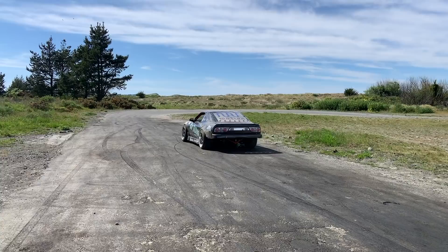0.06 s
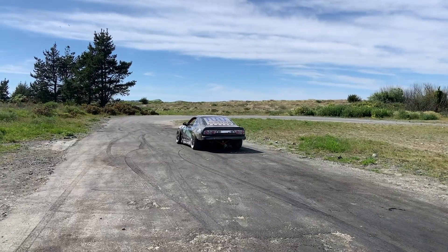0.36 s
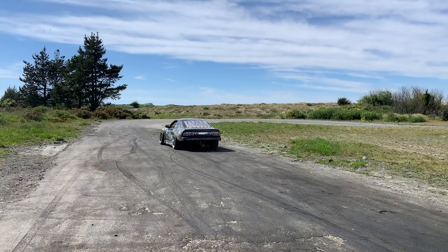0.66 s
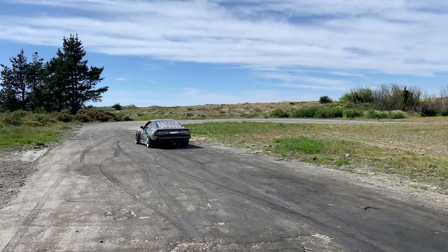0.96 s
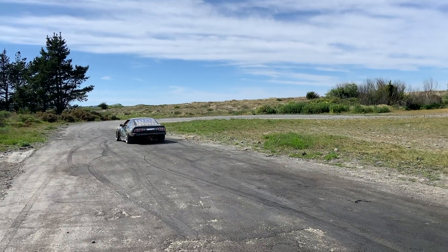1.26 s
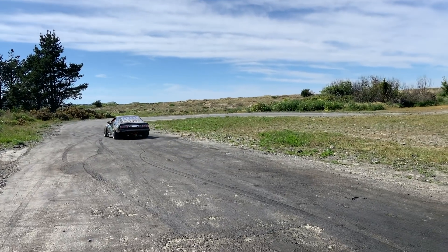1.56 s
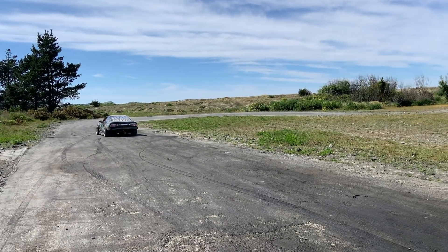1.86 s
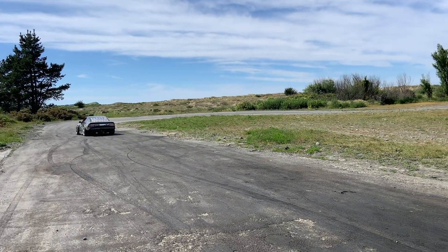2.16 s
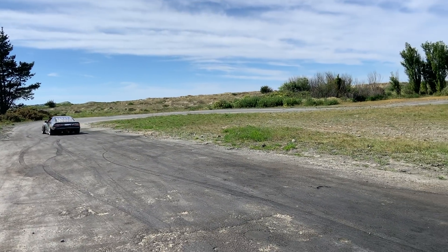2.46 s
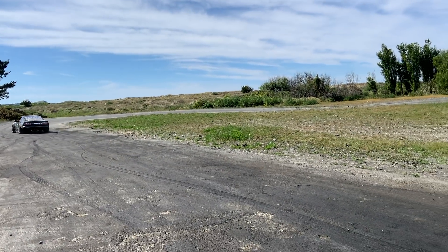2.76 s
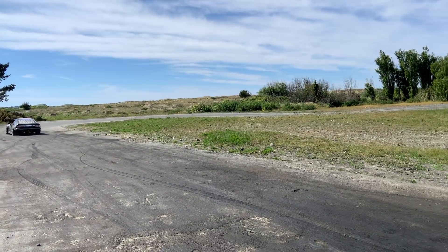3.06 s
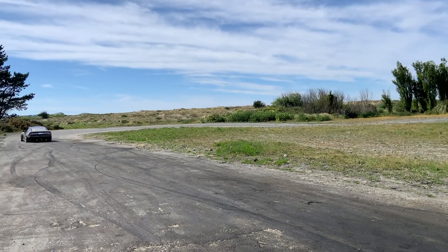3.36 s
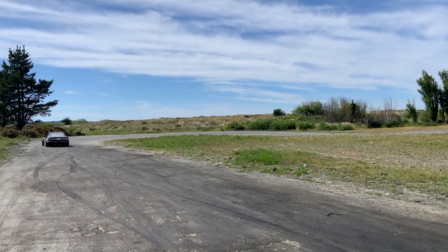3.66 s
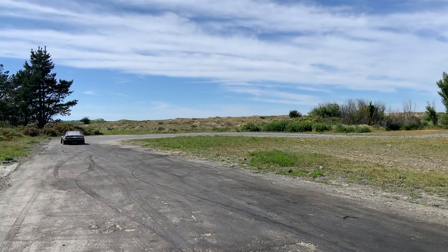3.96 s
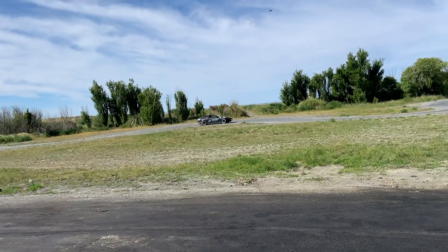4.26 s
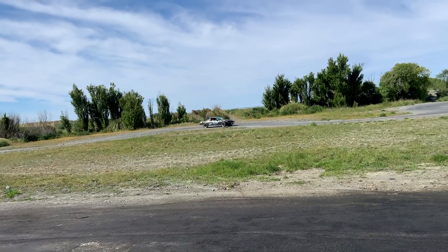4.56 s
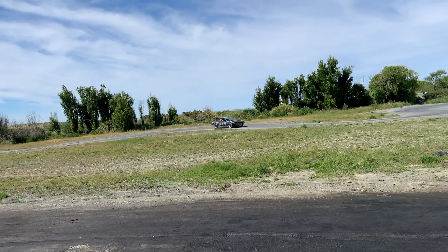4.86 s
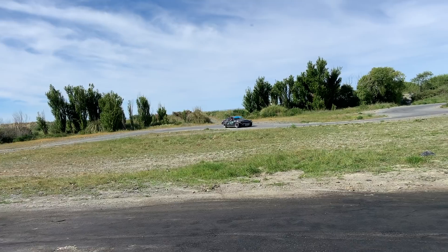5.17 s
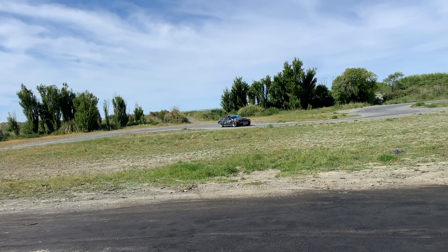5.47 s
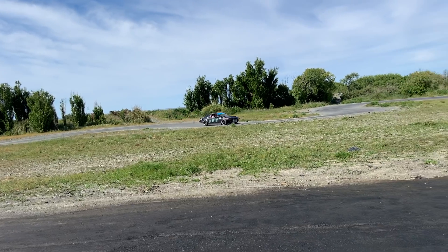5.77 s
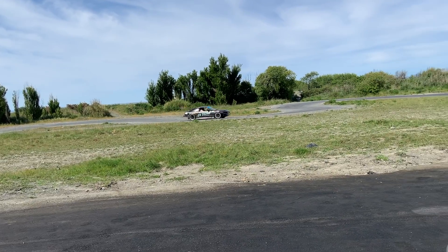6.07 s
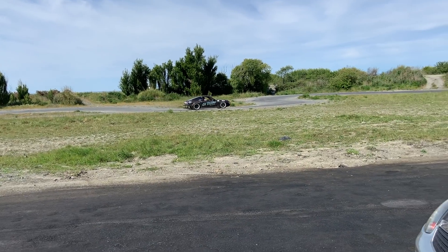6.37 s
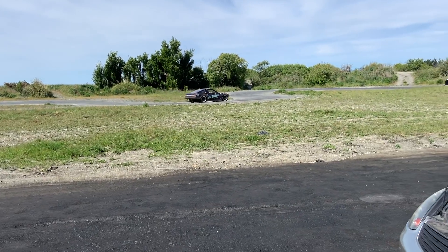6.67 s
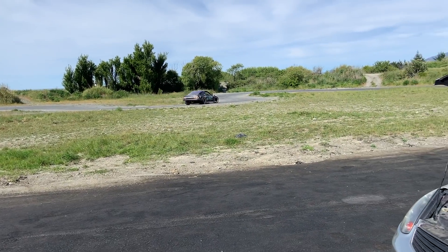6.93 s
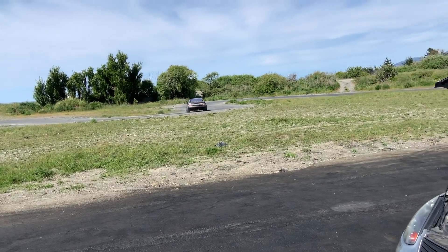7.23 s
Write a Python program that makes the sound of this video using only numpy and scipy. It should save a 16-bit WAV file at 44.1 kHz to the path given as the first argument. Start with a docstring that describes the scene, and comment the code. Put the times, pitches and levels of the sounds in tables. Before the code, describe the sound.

Outdoors beside a track, gusts buffet the microphone while a car drives away with a low pulsing exhaust, a few pops and crunching tyres. A second car idles softly throughout, with faint chirps early on. About halfway, the moving car is suddenly heard in a distant bend, where its revs rise, drop and then surge in sharp stabs as the tyres scrub, spray sand and give short, fluttering squeals.

```python
"""A drift car pulls away and slides

A six-cylinder car drives off over gritty asphalt, its exhaust pulsing with each firing. Wind bumps the
microphone, another engine idles and something twitters. After a cut the car slides through a far bend:
the tyres scrub and squeal, the revs sag, then flare as the tail swings round. A grassy bank echoes
faintly, and two close microphone openings hear the treble a little apart."""
import sys
import numpy as np
from scipy import signal
from scipy.fft import rfft, irfft, next_fast_len
from scipy.io import wavfile
from scipy.ndimage import map_coordinates

SR = 44100
rng = np.random.default_rng(int(sys.argv[2]) if len(sys.argv) > 2 else 0)


def unload_audio(sound):
    """Save the sound as a 16-bit wav file, at the path given as the first command line argument."""
    columns = np.transpose(np.atleast_2d(sound))
    # keep every value between -1 and 1, then stretch to whole-number steps
    steps = np.round(np.clip(columns, -1, 1) * 32767)
    wavfile.write(sys.argv[1], SR, steps.astype(np.int16))


N = 326340
TIME = np.arange(N) / SR
LAUNCH_S, CUT_S = 0.427, 4.03  # the clutch bites; the scene jumps to the bend
START_M, SPEED_M_PER_S = 12, 5  # the car as it drives off


def amp(db):
    """Decibels to gain."""
    return 10 ** (np.asarray(db) / 20)


def decibels(gain):
    """Gain to decibels."""
    return 20 * np.log10(gain)


def unit(x):
    """Scale to an average (rms) level of 1."""
    return x / np.sqrt(np.mean(x ** 2) + 1e-20)


def curve(points):
    """Join (time, value) points into one value per sample."""
    return np.interp(TIME, *np.transpose(points))


def along(points, hz):
    """Read between (frequency, value) points on a log axis."""
    freqs, values = np.transpose(points)
    return np.interp(np.log(hz + 1), np.log(freqs + 1), values)


def wobble(rate):
    """A smooth curve through `rate` random values a second."""
    coarse = np.arange(0, N + 32, 32) / SR
    values = rng.standard_normal(int(N * rate / SR) + 5)
    return np.interp(TIME, coarse, map_coordinates(values, [coarse * rate]))


def swell(start, end, attack, release):
    """Rise smoothly to 1, hold until the end, then die away."""
    rise = np.clip((TIME - start) / attack, 0, 1)
    return np.sin(rise * np.pi / 2) ** 2 * np.exp(-np.maximum(TIME - end, 0) / release)


def filtered(x, response):
    """Multiply each frequency in x by response(hz)."""
    size = next_fast_len(N + 8192)
    return irfft(rfft(x, size) * response(np.fft.rfftfreq(size, 1 / SR)), size)[..., :N]


def shaped(x, spectrum):
    """Colour x with (frequency [Hz], gain [dB]) points."""
    return filtered(x, lambda hz: amp(along(spectrum, hz)))


def noise(spectrum):
    """Coloured noise at level 1."""
    return unit(shaped(rng.standard_normal(N), spectrum))


def angle(hz):
    """Running phase of a moving frequency."""
    return 2 * np.pi * np.cumsum(hz) / SR


def tone(phase, db):
    """A sine wave at the given rms level."""
    return np.sqrt(2) * amp(db) * np.sin(phase)


def bursts(rows, spectrum, decay):
    """Short cracks of coloured noise that start suddenly."""
    size = sum(amp(db) * (TIME > s) * np.exp(-np.abs(TIME - s) / decay) for s, db in rows)
    return filtered(size * rng.standard_normal(N), lambda hz: unit(amp(along(spectrum, hz))))


def distance():
    """Metres to the car as it drives off."""
    return START_M + SPEED_M_PER_S * np.maximum(TIME - LAUNCH_S, 0)


def dulled(x):
    """Air swallows the treble of a far sound."""
    return shaped(x, [(6500, 1), (9000, -10.5), (12000, -8.5), (15000, -6.0)])


def bank_echo(x, fade_s):
    """Grass and trees scatter sound back, differently left and right."""
    t = np.arange(SR // 2) / SR
    tail = rng.standard_normal((2, len(t))) * amp(-60 * t / fade_s)
    echo = signal.fftconvolve(x[None], tail / np.linalg.norm(tail[0]), axes=1)[:, :N]
    return shaped(echo, [(150, -26), (500, -13), (1500, -11), (8000, -22)])


def chirping():
    """A thin, trembling twitter: a few clear chirps among runs of soft ones."""
    # clear chirps (time [s], pitch [Hz], level [dB])
    clear_chirps = [(.1, 3240, -45), (2.665, 3380, -52.5), (2.803, 3244, -47.5)]
    # soft runs (start [s], end [s], level [dB])
    soft_runs = [(0.305, 0.897, -56.5), (2.5, 3.25, -55.5)]
    tremble = angle(1 + .024 * wobble(300))  # phase of an unsteady 1 Hz
    chirps = list(clear_chirps)
    for start, end, db in soft_runs:
        for s in np.arange(start, end, .06):
            late, sharp, loud = rng.standard_normal(3)
            chirps.append((s + .04 * late, 3300 * (1 + .025 * sharp), db + 3 * loud))
    out = np.zeros(N)
    for s, hz, db in chirps:
        near = np.abs(TIME - s) < .05
        phase = hz * tremble[near]
        voice = tone(phase, db) + tone(2 * phase, db + rng.normal(-3, 3))
        out[near] += np.exp(-((TIME[near] - s) / 0.012) ** 2) * voice
    return out


def idling():
    """A waiting car hums steadily over a soft, low murmur."""
    # tones of the hum, main one first (pitch [Hz], level [dB])
    tones = [(124.5, -37), (74.2, -43.5), (248.5, -48.5), (369.4, -49.5)]
    main_hz = tones[0][0]
    phase = angle(main_hz * (1 + 0.01086 * wobble(25)))
    hum = sum(tone(phase * hz / main_hz, db + 2.7 * wobble(15)) for hz, db in tones)
    murmur = noise([(40, -7.5), (80, -1), (330, -6.5), (2000, -26.5), (7000, -50), (16000, -65)])
    return hum + amp(-37) * murmur


def wind(breeze_db=-48.5):
    """Gusts rumble and thump on the microphone, partly different left and right."""
    # gusts (start [s], end [s], level [dB])
    gusts = [(-.1, 0.1, -23), (0.273, 0.423, -23), (1.094, 1.93, -30), (2.623, 3.881, -31.5)]
    # thumps (time [s], level [dB])
    thumps = [(.308, -14.5), (1.25, -12), (1.613, -15), (2.71, -25), (2.89, -20.5), (3.244, -20.5),
              (3.37, -17.5), (3.419, -14)]
    # colour of the rumble (frequency [Hz], level [dB])
    colour = [(18, -44.5), (38, -26), (55, 13), (80, 4.5), (120, 3), (220, -4.5), (4000, -110)]
    gusting = sum(amp(db) * swell(start, end, attack=0.11, release=0.11) for start, end, db in gusts)
    middle, side = (unit(noise(colour) * amp(0.8 * wobble(14))) for _ in range(2))
    out = (amp(breeze_db) + gusting) * (middle + 0.17 * side * np.array([[1], [-1]]))
    for s, db in thumps:
        push = amp(db) * np.exp(-((TIME - s) / 0.016) ** 2)
        out += push * np.sin(angle(80 * (1 + 0.291 * wobble(90))))
    return out


def stone_ticks():
    """Flicked-up stones tick."""
    # ticks (time [s], level [dB])
    ticks = [(2.68, -37), (4.3121, -31.5), (5.6894, -38)]
    return bursts(ticks, [(300, -10), (1500, 0), (3500, -16), (15000, -55)], decay=.008)


def grit(db):
    """Sand sprayed by the tyres: a hiss of tiny bursts, thrown in clumps."""
    # colour of the sand (frequency [Hz], level [dB])
    colour = [(1500, -5), (4500, 1), (11000, -1.5), (13500, -8.5), (15500, -21.5)]
    return amp(db) * unit(noise(colour) * amp(2.0 * wobble(900) + 1.7 * wobble(28)))


def rolling(roar_db=-31, crunch_db=-47, loss_db_per_m=0.01):
    """Tyres roar and crunch, most as they spin at the launch; with distance both fade, the crunch dulls."""
    # colour of the roar (frequency [Hz], level [dB])
    road = [(40, 1.5), (130, 22), (300, 7), (600, 10), (1000, 4.5), (2000, -7), (4000, -19), (6500, -17),
            (16000, -78)]
    metres = distance()
    spin = swell(LAUNCH_S, 0.81, attack=0.13, release=0.092)
    near_db = decibels(START_M / metres)
    crunch = grit(crunch_db + near_db - loss_db_per_m * (metres - START_M) + 2.5 * spin)
    far = np.interp(TIME, [.8, 2.6], [0, 1])
    roar = amp(roar_db + near_db + 1.5 * spin + 2.1 * wobble(16)) * noise(road)
    return roar + (1 - far) * crunch + far * dulled(crunch)


def scrubbing(tread_db=-19.5, sand_db=-55):
    """Sliding rubber chatters, squeaks, hisses and throws sand; it sounds lower as the car turns away."""
    # strength of the scrub (time [s], level [dB])
    scrub_levels = [(4.04, -50.5), (4.75, -40.5), (5.1, -33.5), (5.38, -31.5), (5.76, -43), (6.18, -27),
                    (6.51, -27.5), (6.72, -23), (7.28, -21)]
    # rubber entering the bend (frequency [Hz], level [dB])
    early_colour = [(110, -7), (400, -2), (680, -7.5), (1080, 6.5), (1450, 1), (2050, 2), (2450, -16),
                    (2800, -6.5), (3200, -23), (6800, -20.5), (13000, -79)]
    # rubber after turning away (frequency [Hz], level [dB])
    late_colour = [(50, -13), (350, 1), (640, -17), (1000, 1.5), (1350, 0.5), (1820, -2.5), (2080, -19),
                   (2550, -6), (2900, -33), (6000, -32), (12000, -80)]
    # sand off the rear tyres (start [s], end [s], level [dB])
    sprays = [(5.63, 5.813, -42), (6.863, 7.074, -40.5), (7.242, 7.405, -42)]
    # tyre hiss, dipping between the two slides (time [s], level [dB])
    hiss_levels = [(4.04, -53), (6.28, -40), (6.41, -51), (6.57, -46), (6.72, -40.5), (7.4, -39)]
    turn = np.interp(TIME, [6.1, 6.95], [0, np.pi / 2])
    rubber = np.cos(turn) * noise(early_colour) + np.sin(turn) * noise(late_colour)
    chatter = unit(rubber * amp(1.1 * wobble(25) + 1.2 * wobble(160)))
    squeaks = np.zeros(N)
    for hz in (1003, 1271, 1470, 1770):  # tread blocks squeak at random
        phase = angle(hz * (1 + .04 * wobble(14)))
        squeaks += tone(phase, tread_db + 7.2 * np.minimum(wobble(28), 1))
    spray = sum(amp(db) * swell(start, end, attack=0.098, release=0.13) for start, end, db in sprays)
    hiss = dulled(grit(curve(hiss_levels)))
    first_slip = amp(-48.5) * swell(CUT_S, 6.4, attack=.03, release=0.28)
    rasp = first_slip * noise([(1500, -29), (1980, 0.5), (2450, -28.5)])
    sand = grit(decibels(amp(sand_db) + spray))
    return amp(curve(scrub_levels)) * (chatter + squeaks) + rasp + sand + hiss


def squealing():
    """The rear tyres stick and slip at a gliding pitch; uneven grip makes them flutter."""
    # squeals (start [s], end [s], first pitch [Hz], last pitch [Hz], level [dB], octave offset [dB])
    squeals = [(5.1, 5.3, 1105, 1130, -32, -18), (5.405, 5.45, 1145, 1115, -29, -18),
               (6.155, 6.178, 1360, 1270, -24.5, -24), (6.21, 6.34, 1140, 1100, -32, -22),
               (6.228, 6.258, 1570, 1625, -27.5, -21), (6.375, 6.505, 1110, 1040, -23, -20),
               (6.38, 6.455, 995, 940, -22.5, -6), (6.48, 6.54, 960, 950, -23, -12),
               (6.58, 6.635, 1110, 1175, -29, -14), (6.803, 6.87, 895, 878, -16, -12),
               (6.866, 6.925, 895, 880, -21, -1.5), (7.046, 7.066, 1410, 1420, -21, -22)]
    out = np.zeros(N)
    for start, end, first_hz, last_hz, db, octave_db in squeals:
        hz = np.interp(TIME, [start, end], [first_hz, last_hz])
        rough = np.interp(db, [-23, -16], [1, .4])  # hard squeals are steadier
        phase = angle(hz * (1 + rough * .018 * (wobble(70) + wobble(260))))
        voice = tone(phase, db) + tone(2 * phase, db + octave_db)
        flutter = amp(3.5 * rough * np.minimum(wobble(110), 1))
        out += swell(start, end, attack=0.006, release=0.009) * voice * flutter
    return out


def exhaust_pops():
    """Hard firings pop in the exhaust."""
    # pops (time [s], level [dB])
    pops = [(0.563, -20.5), (0.634, -23), (0.926, -22.5), (1.006, -21), (1.238, -19)]
    return bursts(pops, [(150, -18), (580, 0), (1200, -16), (8000, -70)], decay=.005)


def exhaust_ringing():
    """Uneven firings keep the pipe ringing; each note wanders in pitch and strength."""
    # ringing notes (start [s], end [s], pitch [Hz], level [dB])
    notes = [(.45, 1.45, 315, -40), (.98, 1.85, 550, -38), (.95, 1.8, 603, -42), (2.8, 3.2, 441, -41),
             (4.55, 4.76, 328, -36)]
    out = np.zeros(N)
    for start, end, hz, db in notes:
        ring = tone(angle(hz * (1 + 0.013 * wobble(45.02))), db + 3.0 * wobble(39.95))
        out += swell(start, end, attack=0.09, release=0.1) * ring
    return out


def boom(hz):
    """Gain in dB for a tone at hz: the exhaust booms near its own low notes."""
    # low resonances of the pipe (centre [Hz], width [Hz], level [dB])
    peaks = [(70.4, 19.6, -16), (136.6, 47, -20.5), (176.9, 16.5, -13), (216.5, 12, -28.5),
             (256.3, 12.95, -22.5)]
    power = sum((amp(db) / (1 + (2 * (hz - centre) / width) ** 2)) ** 2 for centre, width, db in peaks)
    return 10 * np.log10(power)


def overtones(phase, hz, pipe, bank_db, uneven_db, rasp_db, flutter_db, fall_db, skip):
    """Exhaust tones above the firing rate, plus gas rasping out at each firing."""
    out = np.zeros(N)
    for k in range(7, 49):
        multiple = k / 6  # six firings make one engine cycle
        if multiple == skip:  # the caller plays this tone
            continue
        # unequal banks (rows of cylinders) add the halves, unequal cylinders the other sixths
        share_db = 0 if k % 6 == 0 else bank_db if k % 3 == 0 else uneven_db
        db = share_db - fall_db * max(0, multiple - 3) + along(pipe, multiple * hz)
        scatter = rng.uniform(0, 2 * np.pi) * (k % 3 > 0)
        out += tone(multiple * (phase + np.pi / 2) + scatter, db + flutter_db * wobble(20))
    puffs = rng.standard_normal(N) * (1 + np.cos(phase)) ** 2 * amp(1.7 * wobble(120))
    gas = shaped(puffs, [(28, -49), (75, -26), *pipe, (9000, -63)])
    return out + amp(rasp_db) * unit(gas)


def pulling_away(ease_s=2.076, coast_db=-10.5, burble_db=2.3):
    """The clutch bites and the revs creep up; the two cylinder banks throb at half the firing rate."""
    # revs (time [s], firing rate [Hz])
    revs = [(0.0, 127.4), (0.42, 119.7), (0.52, 160.7), (0.68, 124.4), (0.78, 152.3), (0.92, 144.8),
            (1.04, 154.7), (1.4, 163), (2.1, 177.8), (2.58, 182), (2.8, 173), (3.2, 172.4), (4.02, 156.7)]
    # the exhaust from close by (frequency [Hz], gain [dB])
    pipe = [(200, -1.5), (260, 12), (320, 1.5), (385, -4), (460, -2.5), (540, 2), (650, -18.5), (712, -3),
            (790, -9), (880, -12), (2500, -9.5)]
    hz = curve(revs)
    stumble = np.interp(TIME, [1.2, 1.9], [.008, .002])  # firing steadies as the revs rise
    phase = angle(hz * (1 + stumble * wobble(70)))
    load = np.maximum(swell(LAUNCH_S, ease_s, attack=0.072, release=0.58), amp(coast_db))
    drive_db = decibels(load * START_M / distance())
    throb = tone(phase / 2, drive_db + boom(hz / 2) + burble_db * wobble(70))
    throb += tone(phase * 1.5, drive_db + boom(hz * 1.5) + 0.5 * wobble(36))
    snarl_db = np.interp(hz, [172, 177], [-38, -31.5])  # harsher at higher revs
    bank_db = np.interp(hz, [160, 178], [-4, 1.5])
    upper = overtones(phase, hz, pipe, bank_db, uneven_db=-13.5, rasp_db=-8,
                      flutter_db=3.5, fall_db=3.0, skip=1.5)
    firing = tone(phase, drive_db + boom(hz) + .5 * wobble(33))
    return firing + load * throb + amp(drive_db + snarl_db) * upper  # the banks even out off load


def sliding_engine():
    """Part throttle through the bend, a lift, then stabs that flare to high revs."""
    # revs (time [s], firing rate [Hz])
    revs = [(4.04, 98.4), (4.28, 117.1), (4.45, 114.2), (4.58, 125.8), (5.4, 158.4), (5.73, 151.1),
            (5.83, 108.8), (6.1, 92.8), (6.39, 89), (6.492, 120.4), (6.646, 186), (6.85, 259.9),
            (6.93, 294.9), (7.0, 244.4), (7.055, 253.7), (7.11, 244.9), (7.335, 255.7), (7.4, 241)]
    # pedal presses (opens [s], closes [s], rise [s], firing tone [dB], octave [dB], overtones [dB])
    throttle = [(3.96, 5.765, 0.38, -22.5, -39, -38.5), (4.42, 4.87, 0.14, -20, -40.5, -40),
                (6.385, 6.576, 0.084, -24, -33, -34), (6.595, 6.854, 0.15, -11.5, -22.5, -25.5),
                (6.912, 7.143, 0.042, -17, -20, -26.5), (7.107, 7.328, 0.15, -11, -27.5, -24)]
    # the exhaust from afar (frequency [Hz], gain [dB])
    pipe = [(200, -4), (245, 2), (290, -4.5), (335, 2), (395, -8.5), (490, -5), (600, -25.5), (770, 1.5),
            (880, -20), (1000, -6), (1270, -1.5), (3000, -18)]
    hz = curve(revs)
    presses = [np.outer(amp(levels), swell(opens, closes, rise, release=0.045))
               for opens, closes, rise, *levels in throttle]
    shut = amp([-53, -40, -38.5])[:, None]  # the same three levels with the pedal up
    fire_db, octave_db, upper_db = decibels(np.maximum(np.max(presses, axis=0), shut))
    phase = angle(hz * (1 + 0.0041 * wobble(25)))
    octave_db += np.interp(2 * hz, [515, 555], [0, -26])  # the silencer cancels it at peak revs
    firing = tone(phase, fire_db + .5 * wobble(35))
    octave = tone(2 * phase, octave_db + 1.9 * wobble(30))
    bank_db = np.interp(hz, [118, 145, 230], [-10, 2, -13])  # the banks differ most at middle revs
    fall_db = np.interp(hz, [160, 230], [7, 2.5])  # firings have a sharper edge at high revs
    upper = overtones(phase, hz, pipe, bank_db, uneven_db=-8, rasp_db=-16,
                      flutter_db=2.0, fall_db=fall_db, skip=2)
    return firing + octave + amp(upper_db) * upper


def stereo(x):
    """The two microphone openings hear slightly different timing and levels."""
    # how far left runs ahead of right (frequency [Hz], phase [rad])
    lead = [(0, 0), (400, -.6), (1150, -.6), (1550, .55), (3000, .9), (3800, 1.7), (4700, 3.2),
            (16000, 19.7)]
    # left minus right (frequency [Hz], level [dB])
    tilt = [(120, 0), (400, 2), (1000, -2.5), (1900, 0)]
    sides = np.array([[.5], [-.5]])
    timing = lambda hz: np.exp(1j * np.interp(hz, *np.transpose(lead)) * sides)
    return filtered(x, lambda hz: timing(hz) * amp(along(tilt, hz) * sides))


def scene():
    """The launch, then the bend, over the background sounds."""
    in_bend = np.clip((TIME - CUT_S) * 200, 0, 1)
    launch = pulling_away() + rolling()
    bend = sliding_engine() + scrubbing() + squealing()
    car = (1 - in_bend) * launch + in_bend * bend + exhaust_ringing()
    mix = car + idling() + stone_ticks() + exhaust_pops() + chirping() + wind()
    return stereo(mix) + bank_echo(car, fade_s=.3)


def record(dry):
    """The microphone sheds the deepest bass and the highest treble."""
    low_hz, top_hz = 32, 15700
    return filtered(dry, lambda hz: (hz < top_hz) * hz ** 2 / np.hypot(hz ** 2, low_hz ** 2))


dry = scene()
out = record(dry)
unload_audio(out)
```